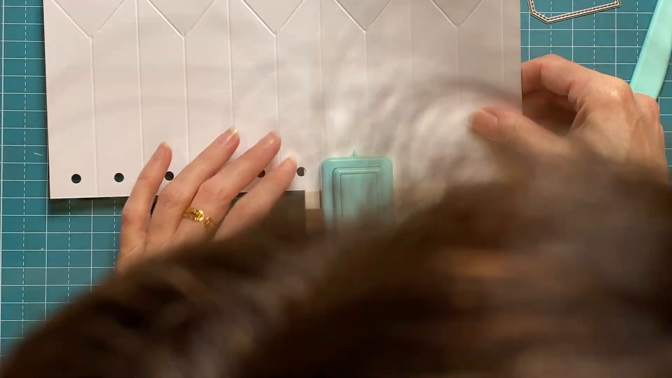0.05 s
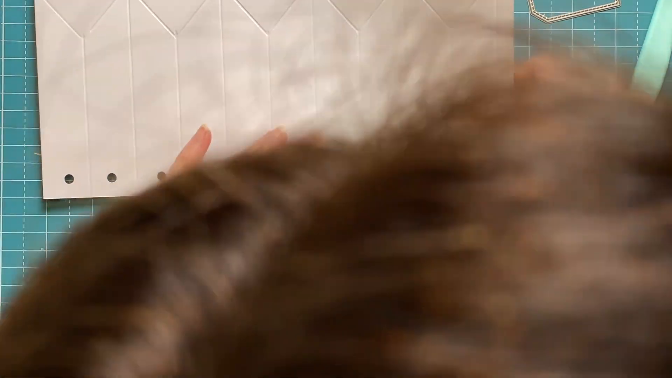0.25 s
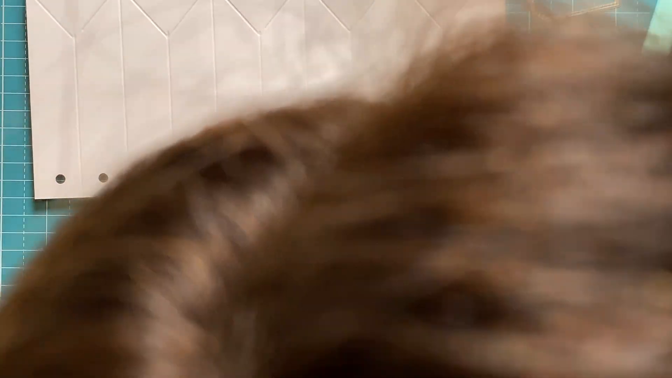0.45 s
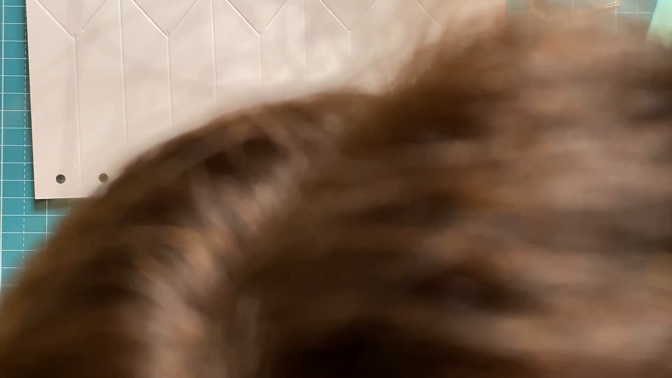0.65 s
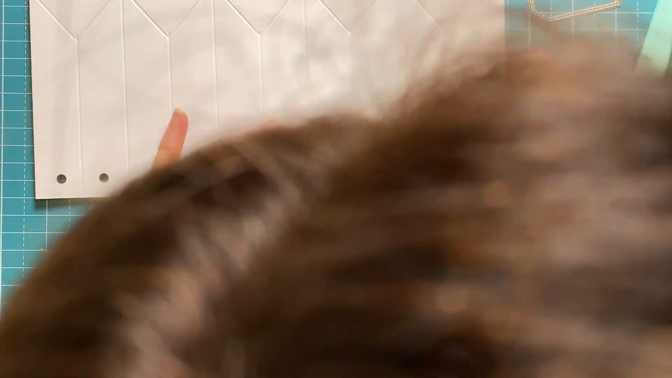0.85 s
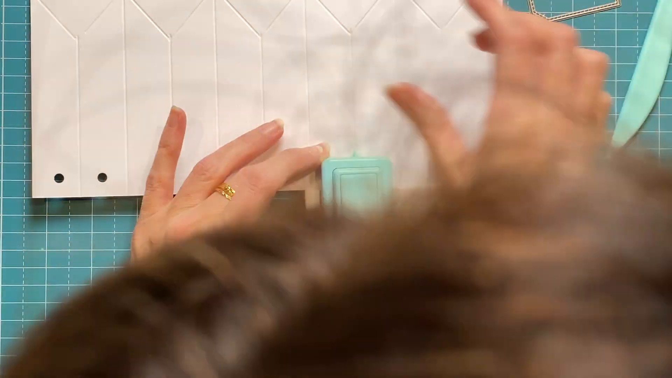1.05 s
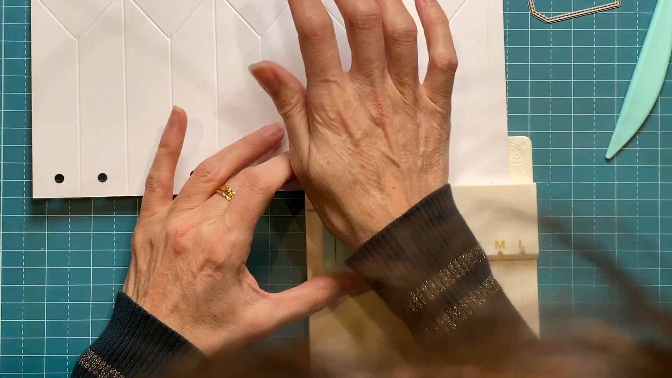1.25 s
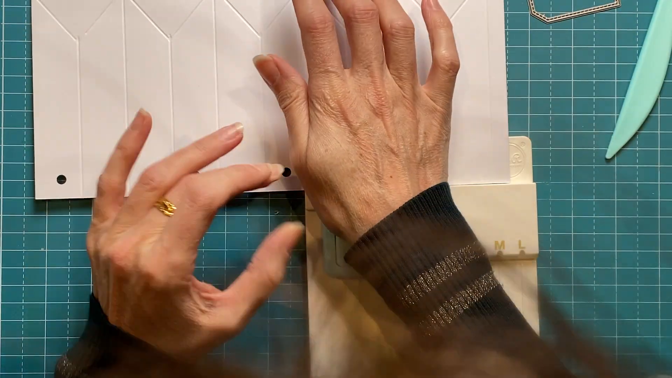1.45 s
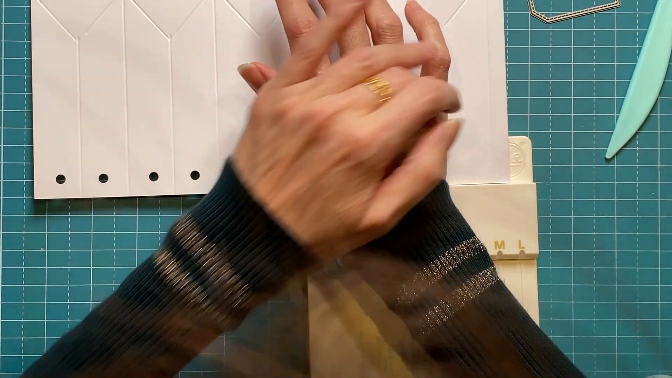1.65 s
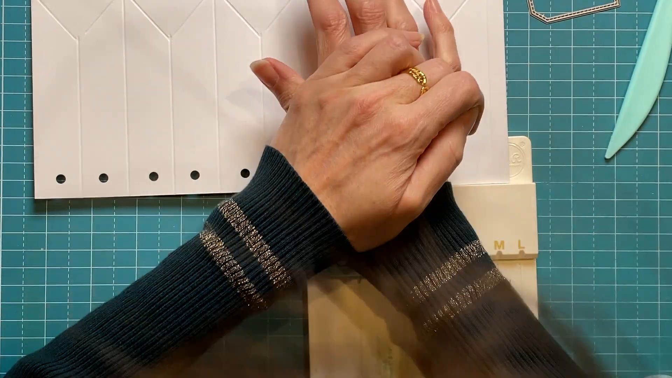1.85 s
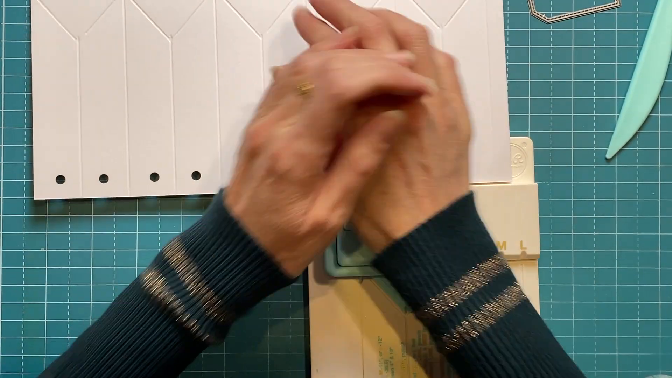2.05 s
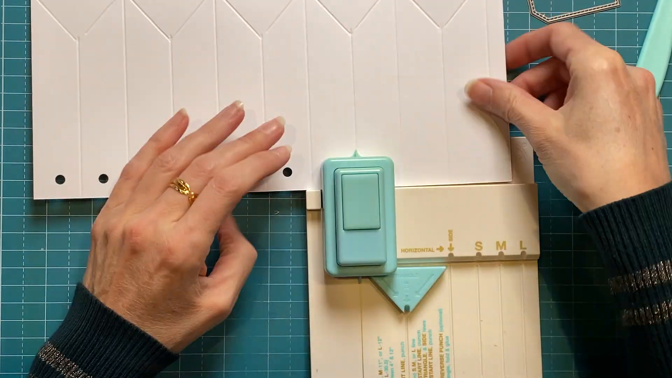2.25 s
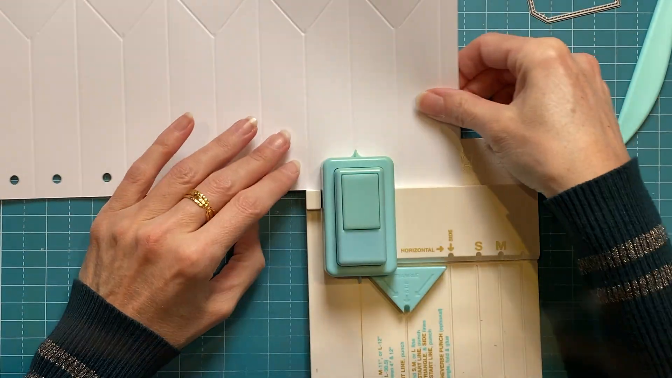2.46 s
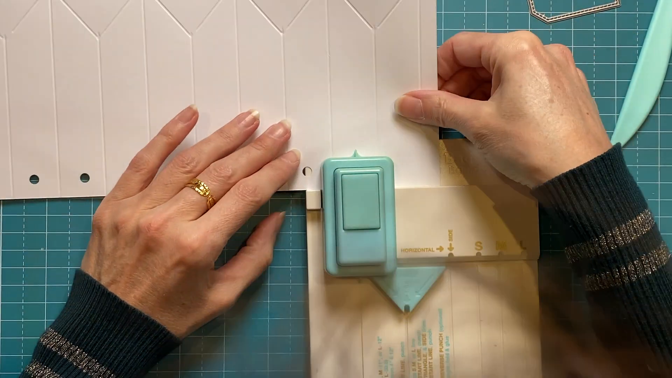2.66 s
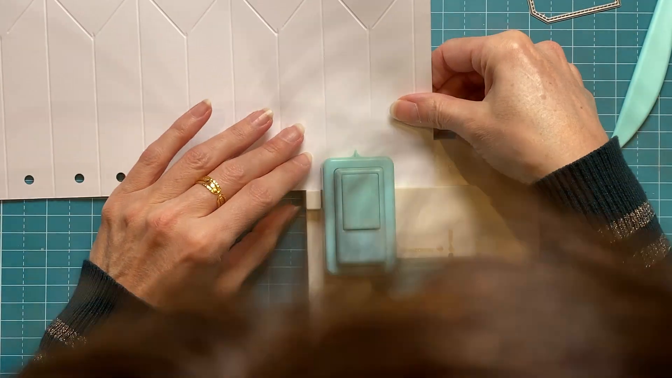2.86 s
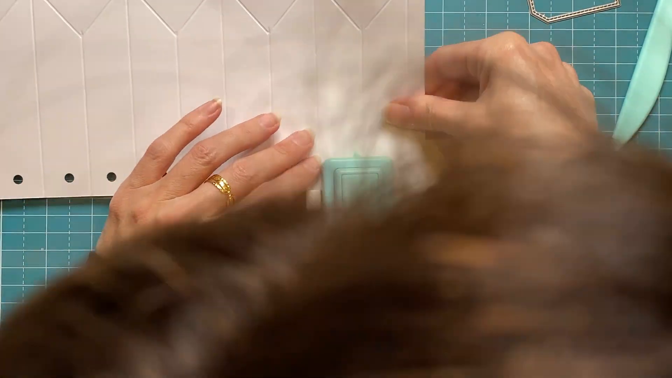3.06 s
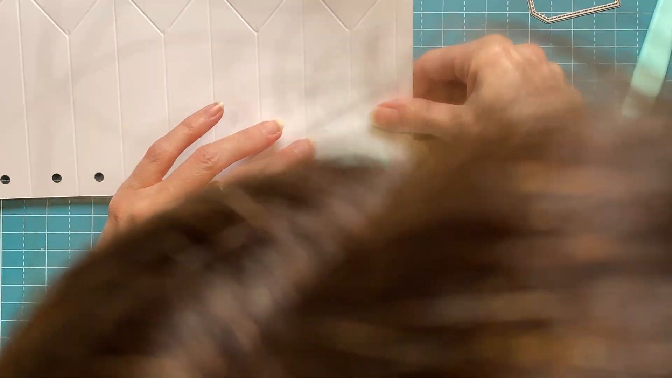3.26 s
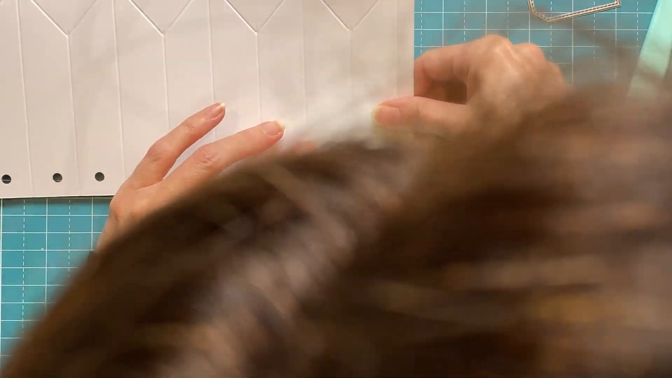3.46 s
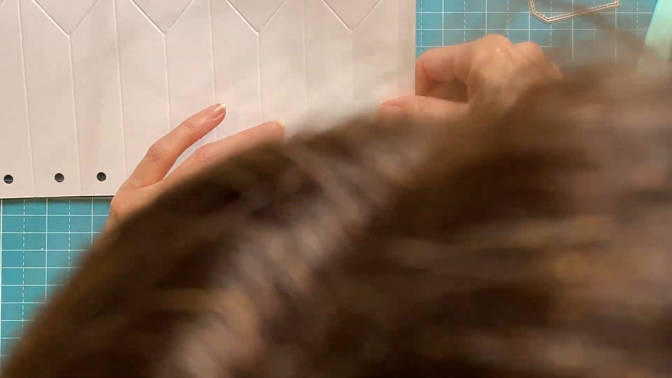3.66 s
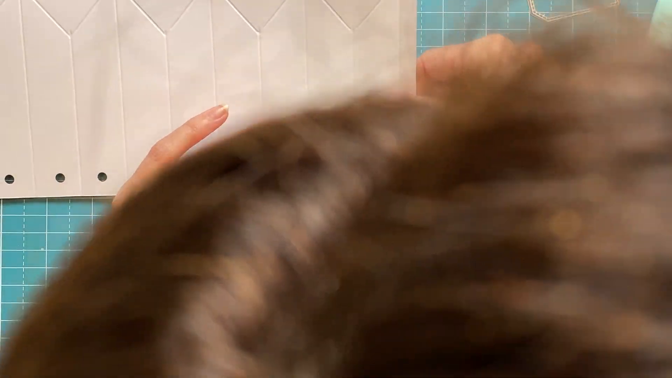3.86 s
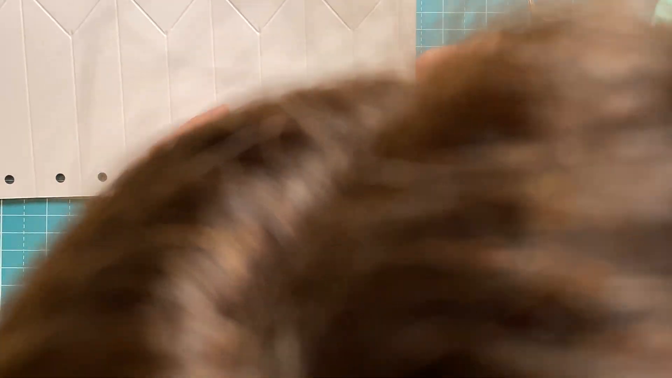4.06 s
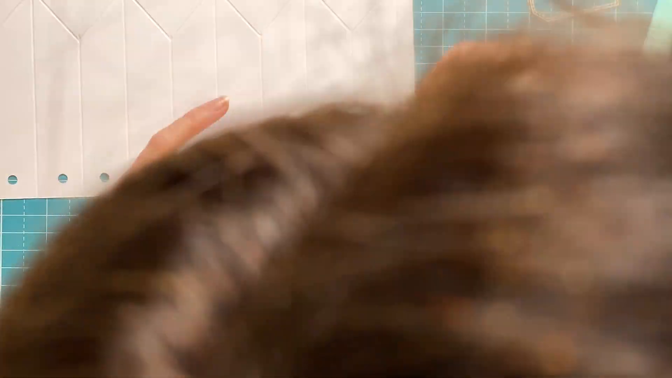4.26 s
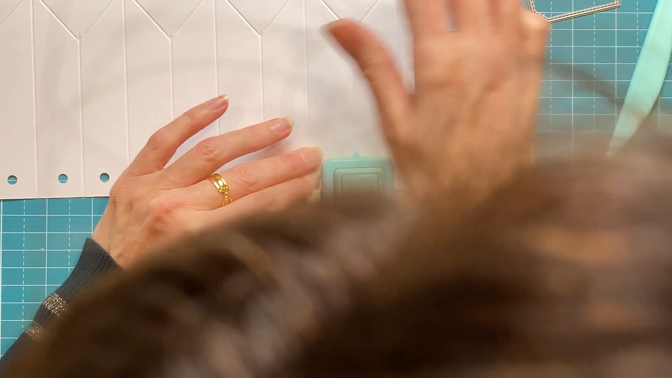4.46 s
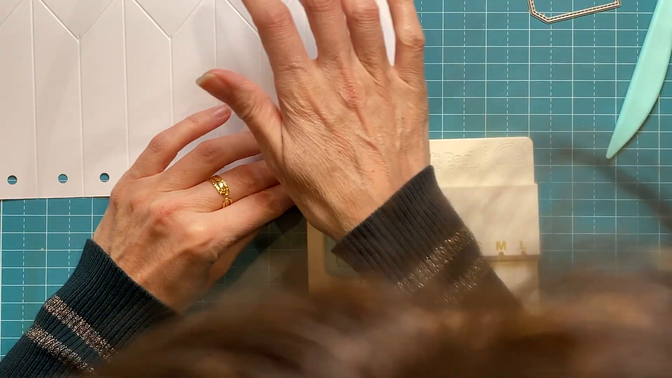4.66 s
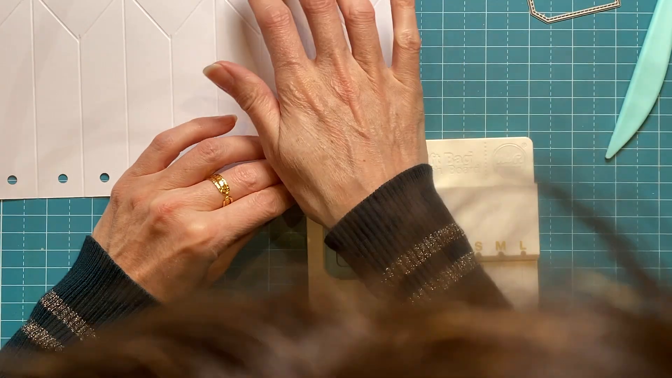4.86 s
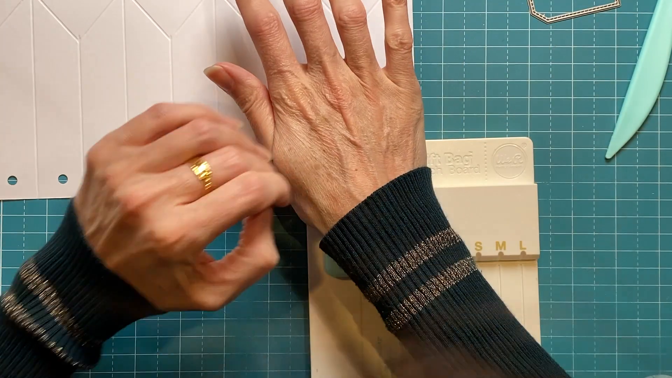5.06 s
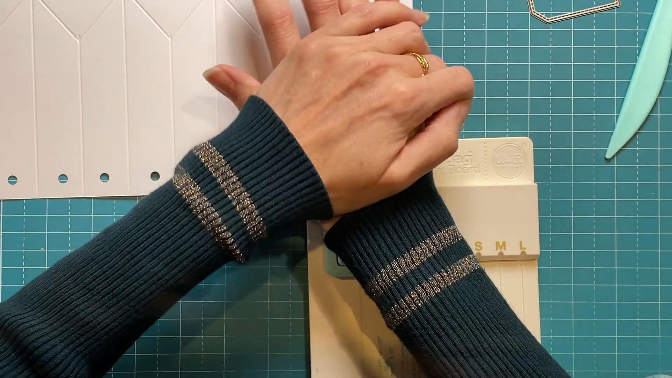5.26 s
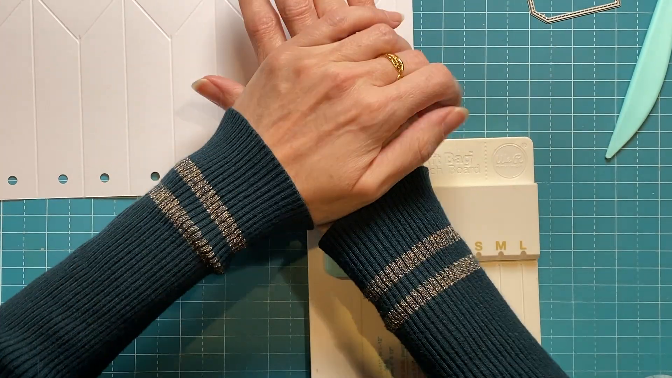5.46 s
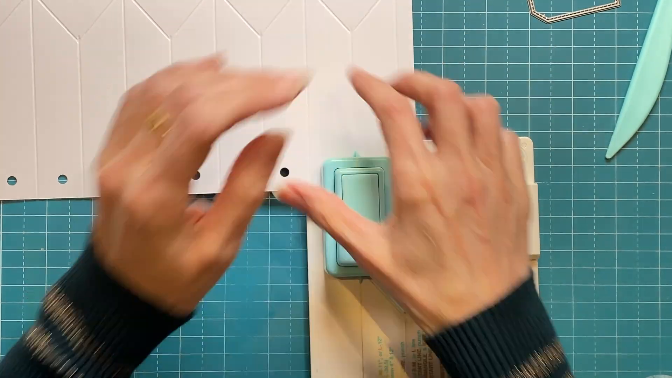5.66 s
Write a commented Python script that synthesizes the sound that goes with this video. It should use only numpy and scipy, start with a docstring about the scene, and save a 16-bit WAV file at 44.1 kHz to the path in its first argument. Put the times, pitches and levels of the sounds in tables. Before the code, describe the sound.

A plastic hole punch clacks through card twice, with soft paper sliding and light taps on a table in between.

```python
"""At a craft table in a small room, a hand slides card along the board of a plastic punch and presses twice.
Each impact excites the damped modes of the plastic and launches a bending wave in the table top;
the wave is dispersive, so its treble arrives first. Sliding friction makes the card hiss and rasp.
The room reverberates over a low rumble, and soft saturation rounds off the loudest peaks."""
import sys
import numpy as np
from scipy import signal
from scipy.fft import rfft, irfft, next_fast_len
from scipy.io import wavfile
from scipy.ndimage import map_coordinates

SR = 44100
rng = np.random.default_rng(int(sys.argv[2]) if len(sys.argv) > 2 else 0)


def int16_out(signal):
    """Quantize to a 16-bit WAV file."""
    q = np.round(np.clip(np.atleast_2d(signal).T, -1, 1) * 32767)
    wavfile.write(sys.argv[1], SR, q.astype(np.int16))


N = 252368

# Contacts of lever, blade and palm: (time [s], rattle peak [dB], rattle centre [Hz], kind)
PUNCH_CONTACTS = [(1.679, -46, 3250, "creak"), (1.684, -50, 1800, "creak"), (1.6936, -18, 2090, "push"),
                  (1.704, -12.5, 2680, "creak"), (1.728, -25, 2140, "push"), (1.747, -29.5, 2300, "creak"),
                  (1.755, -15.5, 2480, "creak"), (1.775, -9.5, 2698, "snap"), (1.781, -9, 2894, "bottom"),
                  (1.9667, -29.5, 1920, "lift"), (1.9957, -18, 2060, "free"),
                  (2.0044, -11.5, 2880, "return"), (2.078, -42, 1850, "lift"),
                  (4.679, -33.5, 1200, "creak"), (4.686, -21, 1480, "palm"), (4.7155, -42.5, 3750, "creak"),
                  (4.7296, -39.5, 3800, "creak"), (4.801, -44, 2180, "creak"), (4.8172, -45, 2100, "creak"),
                  (4.836, -46, 2100, "creak"), (4.9205, -21.5, 2050, "palm"), (5.207, -43.5, 1960, "creak"),
                  (5.22, -44.5, 1950, "creak"), (5.2431, -13, 2640, "push"), (5.2634, -19.5, 2940, "push"),
                  (5.2756, -8.5, 2500, "snap"), (5.2803, -7, 2970, "bottom"), (5.462, -31.5, 3820, "creak"),
                  (5.4719, -29.5, 1920, "lift"), (5.5052, -19.5, 2180, "free"),
                  (5.5125, -9.5, 1000, "return")]
# Timbre by kind: (thump re rattle [dB], rattle T60 [s], treble [dB], cushion cut-off [Hz])
# The hand lands (palm), parts shift (creak), the lever gives (push), the blade shears (snap),
# the lever stops (bottom), the load eases (lift), the blade exits (free), the spring recoils (return).
CONTACT_TIMBRES = {"creak": (-7.5, 0.0157, -3, 1399.5), "push": (7, 0.01, -0.5, 1400),
                   "snap": (-18, 0.0182, 2, 1400), "lift": (4, .04, -2, 1400), "free": (-15, .05, 2, 1400),
                   "bottom": (2, 0.0359, -7, 1399.5), "return": (-10, 0.0033, -4.5, 1401),
                   "palm": (0.5, 0.02, -1, 500)}
# The wrist or heel of the hand leaning on the table: (time [s], rattle peak [dB])
HAND_THUDS = [(.035, -72), (1.288, -72), (4.694, -56), (4.93, -62)]
def punch():
    """Impact excitation: hard parts collide with a rattle; the soft hand gives mostly a low thud."""
    blows = [(time, db, hz, *CONTACT_TIMBRES[kind]) for time, db, hz, kind in PUNCH_CONTACTS]
    centre_hz, thump_db, t60, treble_db, cushion_hz = 900, 30, .02, -10, 110
    leans = [(time, db, centre_hz, thump_db, t60, treble_db, cushion_hz) for time, db in HAND_THUDS]
    return impacts(blows + leans, focus=1.2, snap=1.54, room_db=-11.0)


# Modes of the punch body: (frequency [Hz], bandwidth [Hz], gain [dB])
PLASTIC_MODES = [(1000, 580, -0.5), (1543, 360, -1), (2087, 220, 0.5), (2680, 350, -3.5), (3030, 437, -4),
                 (3740, 750, -5.5), (4770, 2000, -11.5), (7130, 2600, -14.5), (11160, 3200, -21.5),
                 (14000, 7500, -26)]
def plastic_rattle(t, centre_hz, t60, treble_db, focus, snap):
    """Modal response to an impulse and bouncing parts: the direct rattle and the click sent to the room."""
    body = modes(PLASTIC_MODES, spread_db=5.0)
    near = lambda f: 1 + focus * modes([(centre_hz, centre_hz / 5, 0)])(f)  # the part by the contact
    tilt = lambda f: ((1 + amp(treble_db) * 1j * f / 3500) / (1 + 1j * f / 3500)) ** 2
    chatter = rng.standard_normal(len(t)) * amp(-60 * t / t60) * (1 - np.exp(-t / 0.0013))
    force = chatter + snap * signal.unit_impulse(len(t), 40)
    rattle = filtered(force, lambda f: body(f) * near(f) * tilt(f))
    rattle /= abs(rattle).max()
    diffuse = lambda f: np.sqrt(sum(abs(modes([m])(f)) ** 2 for m in PLASTIC_MODES))  # powers add
    delayed_blow = signal.unit_impulse(len(t), 300)  # the room's answer sets in about 7 ms after the contact
    click = filtered(delayed_blow, lambda f: diffuse(f) * abs(near(f)) ** .5 * tilt(f))
    return rattle, click * np.linalg.norm(rattle) / np.linalg.norm(click)


# Modes of the table top: (frequency [Hz], bandwidth [Hz], gain [dB])
TABLE_MODES = [(62.5, 15, -8), (80.6, 25, -4.5), (99.7, 20, 2), (149, 67, -3.5), (231.5, 120, -1.5),
               (327.5, 92, -0.5), (412, 120, -8.5), (531, 88, -6), (860, 350, -15)]
def table_thump(t, cushion_hz, travel_s=.0042):
    """Dispersion: bending waves speed up as the root of frequency; travel_s is the delay at 300 Hz."""
    top = modes(TABLE_MODES, spread_db=2.0)
    dispersion = lambda f: np.exp(-4j * np.pi * travel_s * np.sqrt(f * 300))
    cutting_mat = lambda f: 1 / (1 + 1j * f / cushion_hz) ** 2
    rocking = .06 * rng.standard_normal(len(t)) * amp(-60 * t / 0.038)  # the board settles
    force = signal.unit_impulse(len(t)) + rocking
    thump = filtered(force, lambda f: top(f) * dispersion(f) * cutting_mat(f))
    return thump / abs(thump).max()


def impacts(rows, focus, snap, room_db):
    """Superposition: each contact adds a rattle, a thump and their reverberation."""
    out, t = np.zeros(N + SR), np.arange(SR // 7) / SR
    for time, db, centre_hz, thump_db, t60, treble_db, cushion_hz in rows:
        rattle, click = plastic_rattle(t, centre_hz, t60, treble_db, focus, snap)
        thump = amp(thump_db) * table_thump(t, cushion_hz)
        wet = signal.fftconvolve(click + thump, room_response())
        onset = round(time * SR)
        out[onset:][:len(t)] += amp(db) * (rattle + thump)
        out[onset:][:len(wet)] += amp(db + room_db) * wet
    return out[:N]


# Taps on the board: (time [s], tick peak [dB], thump re tick [dB], centre [Hz], treble [dB])
BOARD_TAPS = [(0.021, -37.5, -8, 935, 2), (0.135, -48, -30, 3770, 2), (0.519, -61, -20, 1260, 0),
              (0.695, -58, -28, 1520, 3), (0.768, -53, -14, 2000, -4), (0.953, -41, -12, 2160, -7),
              (0.969, -48.5, -4, 930, -12), (1.069, -43, -23, 1250, -6), (1.118, -58, -14, 1300, -6),
              (1.179, -54.5, -16, 1190, 3), (1.266, -38.5, -8, 954, -8), (1.275, -40, -5, 947, -6),
              (1.33, -38.5, -6, 1016, -10), (1.343, -43.5, 0, 1260, -9), (1.385, -39.5, -19, 2073, -9),
              (1.397, -41.5, -15.5, 1303, -5), (1.467, -47, -14, 1990, -7), (2.218, -41.5, 3, 1030, 5),
              (2.244, -41.5, 2, 1420, 3), (2.278, -32, -12.5, 1990, -9), (2.296, -35, -3, 1010, -13),
              (2.3875, -25, -35, 1740, -12), (4.101, -48.5, -25.5, 1700, -3), (4.246, -39, -23, 2065, -1)]
def board_ticks(t60=.02, cushion_hz=615):
    """Light impacts of finger and card excite the same modes of plastic and table."""
    taps = [(time, db, hz, thump_db, t60, treble_db, cushion_hz)
            for time, db, thump_db, hz, treble_db in BOARD_TAPS]
    return impacts(taps, focus=1.9, snap=2.9, room_db=-9.5)


# Hiss bands of the card in the slot: (frequency [Hz], bandwidth [Hz], gain [dB])
HISS_BANDS = [(3830, 960, 3), (5600, 830, -1.5), (6620, 1580, -2), (10240, 2100, -8.5),
              (14110, 3000, -12.5)]
# Slot resonances, a low set (rasp) and a high set (ring): (frequency [Hz], bandwidth [Hz], gain [dB])
SLOT_MODES = [
    [(870, 310, -5), (1644, 540, 12), (2050, 660, 1.5)],
    [(2840, 730, 4.5)],
]
# Strokes: (start [s], fastest [s], stop [s], peak level [dB], swell [dB], rasp [dB], ring [dB])
CARD_STROKES = [(0.0, 0.023, 0.16, -66.5, 2, 1, -1), (0.133, .33, .42, -63, 6, 4.5, 1.5),
                (0.682, 0.912, 0.96, -57.5, 19.5, 1.5, -2.5), (0.947, .956, 0.95, -60.5, 8, 2, -2),
                (1.275, 1.31, 1.37, -74, 3, 8, -5), (1.36, 1.391, 1.4, -61, 18, 1, 5),
                (2.273, 2.355, 2.53, -53, 6, 1, 11), (2.443, 2.488, 2.62, -52.5, 6, 2, 8),
                (2.62, 2.797, 2.954, -63, 9.5, 3, 4.5), (2.951, 2.984, 3.13, -65.5, 5.5, 8, 4.5),
                (3.048, 3.095, 3.18, -63.5, 9.5, 6.5, 3.5), (3.16, 3.255, 3.36, -69, 5, 5, -1),
                (3.43, 3.471, 3.6, -79.5, 4.5, 8.5, -2.5), (3.616, 3.658, 3.71, -81, 4, 12.5, -3),
                (3.77, 3.786, 3.85, -83, 5.5, 9, -2), (4.099, 4.247, 4.255, -59.5, 8, 2.5, -6),
                (4.93, 4.991, 5.23, -69.5, 3, -6.5, -4.5), (5.193, 5.216, 5.5, -69, 4, -4, -4.5),
                (5.555, 5.62, 6.1, -72, 6, 0, -5)]
def sliding_card(fade_db=19.5, fade_curve=1.4, edge_s=.006):
    """Sliding friction: paper fibres catch in dense, uneven grains and drive the slot's resonances."""
    t, power = np.arange(N) / SR, np.zeros((3, N))
    for start, fastest, stop, db, swell_db, rasp_db, ring_db in CARD_STROKES:
        before_peak = np.clip((fastest - t) / (fastest - start), 0, 1)
        braking = np.clip((t - fastest) / (stop - fastest), 0, 1) ** fade_curve
        gate = np.clip(np.minimum(t - start, stop - t) / edge_s + 1, 0, 1)
        envelope = gate * amp(db - swell_db * before_peak - fade_db * braking)
        power += (envelope * amp([[0], [rasp_db], [ring_db]])) ** 2
    grains = rng.standard_normal((3, N)) * amp(0.85 * wobble(350) + 1.3 * wobble(35))
    low, high = SLOT_MODES
    hiss, rasp, ring = (filtered(g, modes(m)) for g, m in zip(grains, [HISS_BANDS, low, high]))
    ring = filtered(ring, modes(high)) / amp(high[0][2])  # a second pass steepens the flanks
    rasp = filtered(rasp, lambda f: 1 / (1 + (900 / (f + 1)) ** 4))  # light card radiates no bass
    return (np.sqrt(power) * [hiss, rasp, ring]).sum(axis=0) / hiss.std()


# Reverberation time of the room: (frequency [Hz], T60 [s])
ROOM_T60 = [(60, 0.82), (150, .5), (500, 0.65), (2000, 0.39), (6000, .28), (15000, 0.27)]
def room_response():
    """Diffuse decay: a random response of unit energy, each frequency dying at its own rate."""
    hz, t, spectrum = signal.stft(rng.standard_normal(SR // 2), SR, nperseg=512)
    decay = amp(-60 * t / log_interp(ROOM_T60, hz)[:, None])
    response = signal.istft(spectrum * decay, SR, nperseg=512)[1]
    return response / np.linalg.norm(response)


def moving_reverb(x):
    """Reflection paths change as a source moves, so each quarter second has its own response."""
    out, step = np.zeros(N + SR), SR // 4
    for start in range(0, N, step):
        wet = signal.fftconvolve(x[start:start + step], room_response())
        out[start:start + len(wet)] += wet
    return out[:N]


# Spectrum of the room's rumble and hiss: (frequency [Hz], relative density [dB])
AMBIENT_SPECTRUM = [(13, -34), (22, 1.5), (72, -3), (337, -21.5), (398, -22.5), (672, -25.5), (1580, -32),
                    (1810, -31.5), (2260, -35.5), (3060, -36.5), (7190, -41.5), (13900, -47.5),
                    (16000, -58.5)]
def ambient_noise(level_db=-59.5):
    """Amplitude modulation: the level of a rumble and faint hiss wanders slowly."""
    envelope = amp(level_db + 0.56 * wobble(1.7))
    noise = filtered(rng.standard_normal(N), lambda f: amp(log_interp(AMBIENT_SPECTRUM, f)))
    return envelope * noise / np.sqrt(np.mean(noise ** 2))


def modes(table, spread_db=0):
    """Modal sum: damped resonators of alternating sign, their gains scattered by spread_db."""
    gains = amp(spread_db * rng.standard_normal(len(table)))
    return lambda f: sum((-1) ** k * gains[k] * amp(db) * 1j * f * bw / (hz * hz - f * f + 1j * f * bw)
                         for k, (hz, bw, db) in enumerate(table))


def filtered(x, response):
    """Convolution theorem: filtering multiplies the spectrum by a frequency response."""
    size = next_fast_len(len(x) + 8192)
    return irfft(rfft(x, size) * response(np.fft.rfftfreq(size, 1 / SR)), size)[:len(x)]


def wobble(rate):
    """Spline interpolation through random knots, rate per second."""
    return map_coordinates(rng.standard_normal(int(N * rate / SR) + 4), [np.arange(N) * rate / SR])


def log_interp(points, hz):
    """Interpolation on a logarithmic frequency axis."""
    freqs, values = np.transpose(points)
    return np.interp(np.log(hz + 1), np.log(freqs + 1), values)


def amp(db):
    """Amplitude ratio of a level in decibels."""
    return 10 ** (np.asarray(db) / 20)


def scene():
    """Superposition: the pressures of punch, ticks, card and room add in one channel."""
    contacts = punch() + board_ticks()
    card = sliding_card()
    return (contacts + card + amp(-12) * moving_reverb(card) + ambient_noise())[None]


def record(dry, ceiling=.5, bass_hz=32, top_hz=16000):
    """Soft saturation rounds the peaks; a band-pass removes the deepest bass and highest treble."""
    rounded = dry[0] / (1 + abs(dry[0] / ceiling) ** 5) ** (1 / 5)
    band = lambda f: np.clip((top_hz - f) / 400, 0, 1) / (1 + (bass_hz / (f + 1)) ** 6)
    return filtered(rounded, band)[None]


dry = scene()
out = record(dry)
int16_out(out)
```